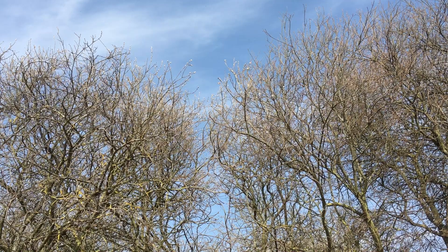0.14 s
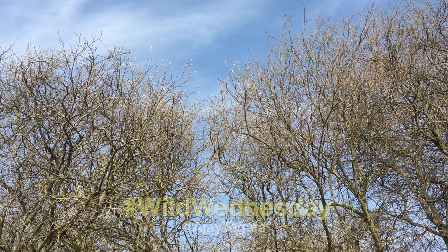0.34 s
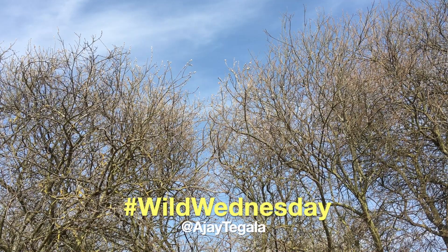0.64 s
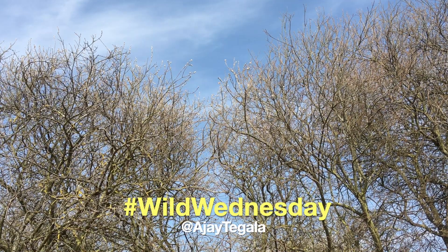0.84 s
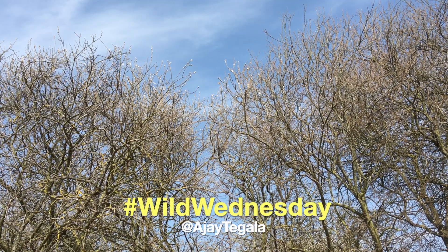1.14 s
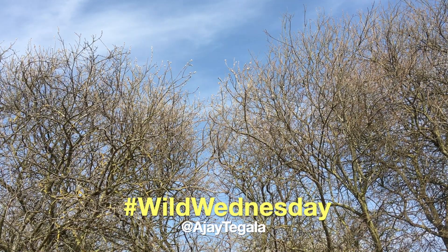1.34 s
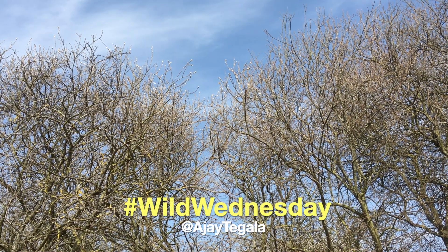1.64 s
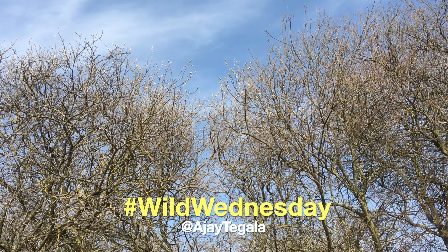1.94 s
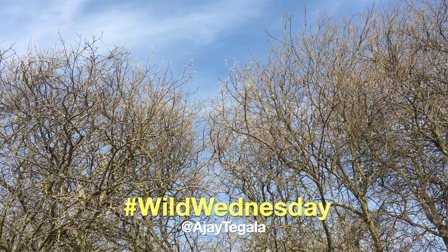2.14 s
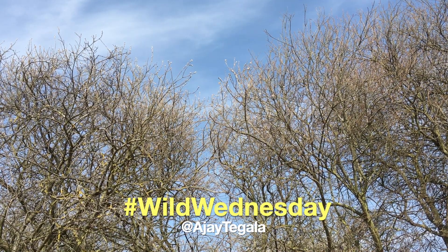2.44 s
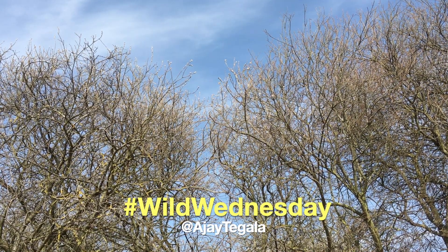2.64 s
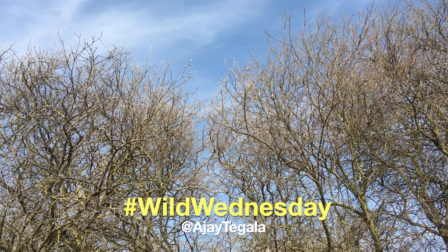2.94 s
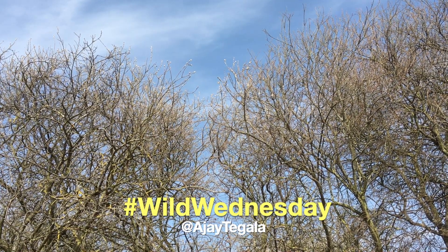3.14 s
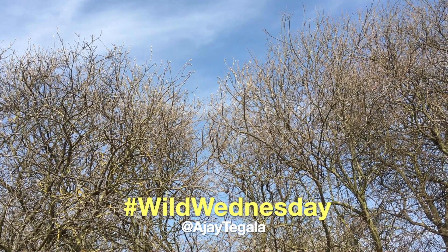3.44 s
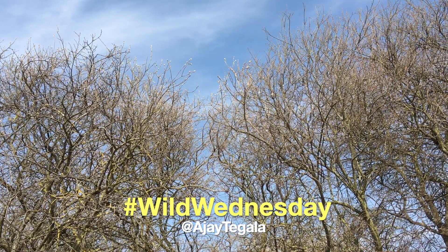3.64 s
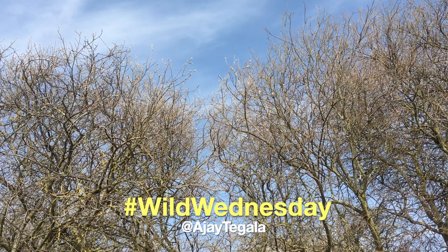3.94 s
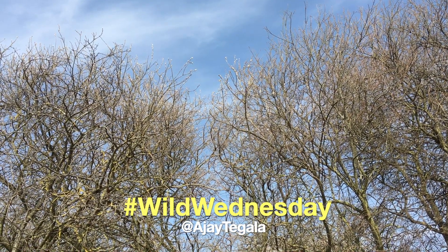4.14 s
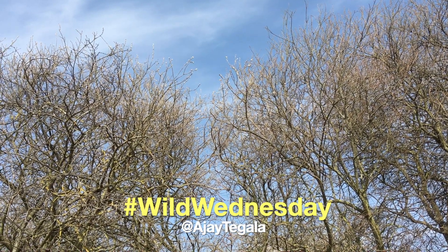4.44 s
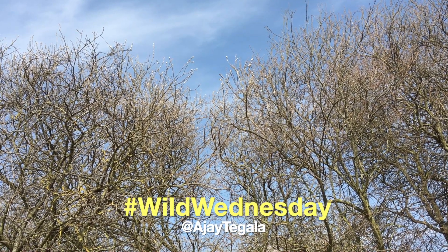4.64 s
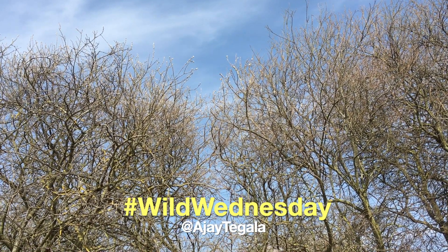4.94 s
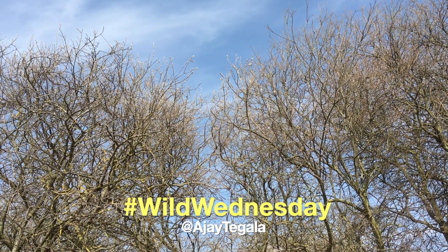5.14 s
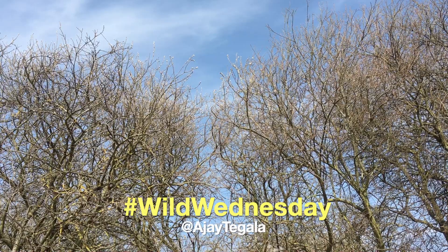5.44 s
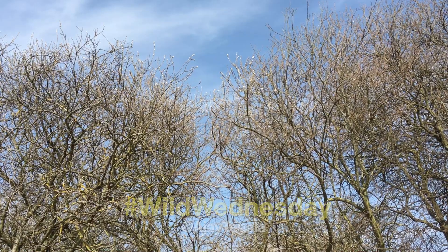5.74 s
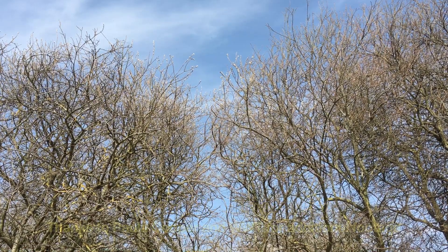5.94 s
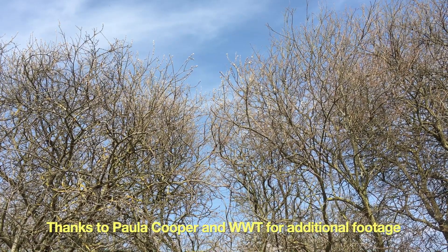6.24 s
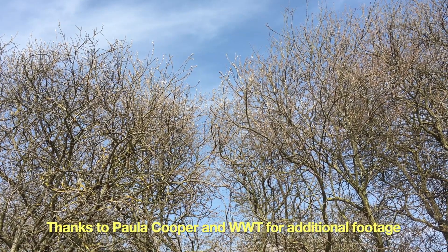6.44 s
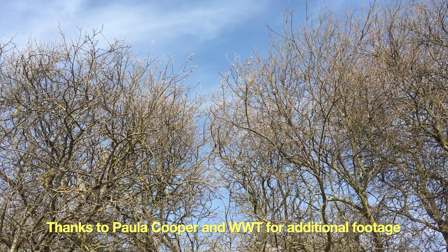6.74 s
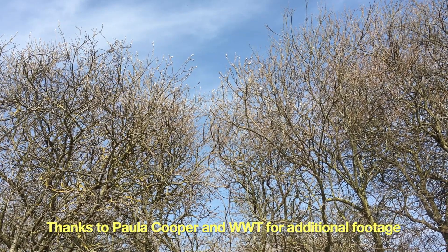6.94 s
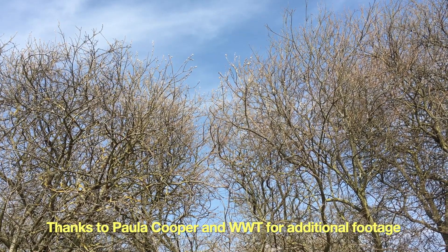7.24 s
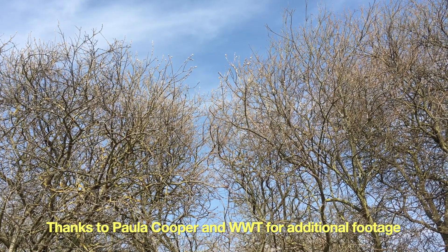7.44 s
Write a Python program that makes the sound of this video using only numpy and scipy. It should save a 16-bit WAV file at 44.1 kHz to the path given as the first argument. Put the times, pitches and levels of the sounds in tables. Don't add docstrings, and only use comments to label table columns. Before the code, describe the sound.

In a bare echoing wood, songbirds whistle and chatter while a woodpecker hammers two rapid rolls and a distant goose honks once.

```python
import sys
import numpy as np
from scipy import signal
from scipy.fft import rfft, irfft, next_fast_len
from scipy.io import wavfile
from scipy.ndimage import uniform_filter1d, map_coordinates

SR = 44100
rng = np.random.default_rng(int(sys.argv[2]) if len(sys.argv) > 2 else 0)


def level_to_linear(level):
    exponent = np.asarray(level, float) / 20
    return 10 ** exponent


def master_out(mix):
    frames = np.transpose(np.atleast_2d(mix))
    ceiling = np.clip(frames, -1, 1)
    pcm = np.round(ceiling * 32767).astype(np.int16)
    wavfile.write(sys.argv[1], SR, pcm)


N = 334719


def unit(x):
    return x / np.sqrt(np.mean(x ** 2) + 1e-20)


def along(points, hz):
    f, v = np.transpose(points)
    return np.interp(np.log(hz + 1), np.log(f + 1), v)


def curves(rows):
    s, *cols = np.transpose(rows)
    return [np.interp(np.arange(N) / SR, s, c) for c in cols]


def wobble(rate_hz):
    knots = rng.standard_normal(int(N * rate_hz / SR) + 4)
    return map_coordinates(knots, [np.arange(N) * rate_hz / SR])


def filtered(x, response):
    m = next_fast_len(N + SR // 2)
    return irfft(rfft(x, m) * response(np.fft.rfftfreq(m, 1 / SR)), m)[:N]


def resonances(modes):
    def response(f):
        total = 0
        for k, (hz, width_hz, db) in enumerate(modes):
            damping = 1j * f * width_hz
            total = total + (-1) ** k * level_to_linear(db) * damping / (hz * hz - f * f + damping)
        return total
    return response


def noise(spectrum):
    return unit(filtered(rng.standard_normal(N), lambda hz: level_to_linear(along(spectrum, hz))))


def add(track, s, sound):
    part = track[round(s * SR):][:len(sound)]
    part += sound[:len(part)]


def echoes(x, gap_s, piece_s=.25):
    # frequency in Hz, t60 in seconds.
    decay = [(500, 0.26), (1300, 1), (3500, 0.94), (8000, 0.6), (14000, 0.19)]
    out, step = np.zeros(N), round(piece_s * SR)
    fade = np.hanning(2 * step)
    padded = np.pad(x, (step, step))
    for k in range(0, N, step):
        hz, t, z = signal.stft(rng.standard_normal(SR), SR, nperseg=256)
        tail = signal.istft(z * level_to_linear(-60 * t / along(decay, hz)[:, None]), SR, nperseg=256)[1]
        tail = tail * (1 + 2.3 * np.exp(-np.arange(len(tail)) / (0.0075 * SR)))
        piece = padded[k:k + 2 * step]
        heard = signal.fftconvolve(piece * fade[:len(piece)], tail / np.linalg.norm(tail))
        add(out, max(k - step, 0) / SR + gap_s, heard[max(step - k, 0):])
    return out


def woodpecker():
    # start in seconds, peak level in dB.
    blows = [(2.6533, -53), (2.7184, -46.5), (2.7774, -44), (2.8324, -45.5), (2.885, -45), (2.939, -45.5),
             (2.9903, -45.5), (3.0392, -46), (3.0873, -47), (3.1345, -47.5), (3.1803, -47), (3.2257, -46),
             (3.269, -48), (3.311, -50.5), (3.3523, -49.5), (3.3894, -53), (3.426, -57)]
    # frequency in Hz, width in Hz, level in dB.
    branch = [(675, 120, -1), (1230, 250, 6.5), (2065, 150, -2.5)]
    # delay in seconds, level in dB.
    trunks = [(.008, -8), (.013, -8.5), (.019, -9.5), (.033, -14)]
    t = np.arange(round(.006 * SR)) / SR
    hz = 1080 + 1300 * np.exp(-t / .0006) + 950 / (1 + np.exp((t - .0024) / .0002))
    attack = np.minimum(t / 0.0024, 1) ** .7
    decay = level_to_linear(-60 * np.maximum(t - .0027, 0) / 0.002)
    chirp = np.sin(2 * np.pi * np.cumsum(hz) / SR) * attack * decay
    knock, push = np.zeros(N), np.zeros(N)
    for s, db in blows:
        add(knock, s, level_to_linear(db + 4.2) * chirp)
        push[round((s + .002) * SR)] = level_to_linear(db + 26)
    hollow = resonances(branch)
    ring = filtered(push, lambda f: hollow(f) ** 2)
    near = sum(level_to_linear(db) * np.roll(ring, round(s * SR)) for s, db in trunks)
    ring_echo = level_to_linear(4.3) * echoes(ring, gap_s=.01, piece_s=0.586)
    knock_echo = level_to_linear(-6.5) * echoes(knock, gap_s=0.00349)
    return knock + level_to_linear(.5) * ring + level_to_linear(2) * near + ring_echo + knock_echo


def whistle(hz, db, quiver_hz=32, flutter_db=2.0):
    t = np.arange(len(hz)) / SR

    def shaky(knots, rate_hz):
        return map_coordinates(rng.standard_normal(knots), [t * rate_hz], mode="mirror")

    phase = 2 * np.pi * np.cumsum(hz + quiver_hz * shaky(64, 170)) / SR
    edge_s = min(0.00059 + 0.077 * t[-1], .006)
    edge = np.sin(np.pi / 2 * np.clip(np.minimum(t, t[-1] - t) / edge_s, 0, 1)) ** 2
    level = level_to_linear(db + flutter_db * shaky(64, 130)) * np.sqrt(2)
    husk = 1 + level_to_linear(-17) * shaky(512, 1700)
    octave = level_to_linear(-52 + 0.0035 * hz) * np.sin(2 * phase)
    return level * edge * husk * (np.sin(phase) + octave)


def song(singers, hooks=(), stairs=(), arches=(), quiver_hz=32, flutter_db=2.2):
    bends = {"level": (0.55, -0.52), "hump": (-7, -6), "dip": (8.83, 3.2), "rise": (-7.5, 3.7),
             "scoop": (-5, 15), "fall": (6.5, -7.5), "flick": (-18.5, 19.7), "drop": (17.6, -9.5),
             "leap": (-27, 3.8), "sag": (2.8, -1.8), "dive": (40, -10), "lift": (-16, 3), "tip": (9, -17),
             "plunge": (28, -28), "bow": (-14, -18), "droop": (1, -7), "cup": (11, 15)}
    hook_shape = [(0, 1.5), (.1, 1.2), (.25, 1.01), (.4, .98), (.7, 1.03), (.82, .98), (1, .72)]
    stair_shape = [(0, 1.28), (.15, 1.08), (.3, 1.0), (.42, .97), (.55, .75), (.65, .67), (1, .65)]
    arch_shape = [(0, .88), (.12, 1), (.4, .96), (1, .82)]
    track = np.zeros(N)
    for singer in singers:
        for bend, notes in singer.items():
            start, end = np.array(bends[bend]) * .01
            for s, length_s, hz, db in notes:
                u = np.linspace(-1, 1, round(length_s * SR))
                path = 1 + (end - start) / 2 * u + (start + end) / 2 * u * u
                add(track, s, whistle(hz * path, db, quiver_hz, flutter_db))
    for shape, calls in ((hook_shape, hooks), (stair_shape, stairs), (arch_shape, arches)):
        for s, length_s, shelf_hz, db in calls:
            path = np.interp(np.linspace(0, 1, round(length_s * SR)), *np.transpose(shape))
            add(track, s, whistle(shelf_hz * uniform_filter1d(path, size=200, mode="nearest"), db))
    return track


def slapped(x):
    # delay in seconds, level in dB.
    slap = [(.0105, -10)]
    return x + sum(level_to_linear(db) * np.roll(x, round(s * SR)) for s, db in slap)


def returning_singers():
    quick = { "level": [(.443, 0.081, 8400, -57), (.628, 0.019, 4630, -56), (.662, 0.014, 4360, -50),
             (.771, 0.01, 4650, -46), (.812, .016, 4310, -47), (.854, 0.012, 4630, -49),
             (.886, 0.014, 4260, -50), (.933, .025, 4660, -50), (1.73, .018, 4890, -59.5),
             (1.786, 0.023, 5900, -55.5), (1.268, .03, 4500, -58), (1.626, .03, 5000, -56),
             (2.022, .02, 5000, -63)], "lift": [(1.25, .016, 4380, -49)], "sag": [(.84, 0.063, 3630, -66.5),
             (.925, 0.046, 3800, -60.5), (1.085, 0.035, 3700, -61.5)], "hump": [(.589, .035, 4467, -45.5)],
             "dip": [(.612, 0.015, 3810, -47), (1.033, .025, 4390, -45), (1.56, 0.027, 6560, -47),
             (1.578, 0.028, 6060, -44), (1.158, .03, 5450, -63)], "rise": [(.724, 0.022, 5060, -53.5),
             (1.16, .025, 5150, -50.5), (1.162, .035, 8050, -73)], "fall": [(.69, .045, 4110, -47.5),
             (1.8, 0.027, 4710, -57), (1.605, .022, 5420, -51)], "drop": [(2.255, .04, 1750, -78),
             (1.82, 0.029, 5400, -56), (2.008, .015, 5450, -57)]}
    upstrokes = {"flick": [(1.548, 0.01, 5630, -53), (1.665, 0.012, 4510, -51.5),
                 (1.773, 0.007, 4720, -48)]}
    return song([quick, upstrokes])


def clear_singer():
    dry_notes = {"level": [(2.34, .055, 3630, -64)], "fall": [(2.285, .032, 5650, -70)],
                 "dive": [(.508, .075, 3250, -76)]}
    # start in seconds, length in seconds, shelf pitch in Hz, level in dB.
    hooks = [(2.673, .102, 4650, -64.5), (3.043, .102, 4650, -66)]
    stairs = [(2.271, 0.13, 5500, -77)]
    return song([dry_notes], hooks, stairs)


def near_singers():
    high = { "leap": [(5.062, 0.049, 8700, -65), (5.072, 0.036, 7640, -62.5)],
            "drop": [(7.52, 0.0073, 6540, -59)], "flick": [(5.582, .012, 4700, -61),
            (6.81, 0.009, 5500, -58)], "lift": [(5.181, .032, 8750, -64), (6.884, .017, 9250, -72)],
            "tip": [(5.104, .025, 8300, -62)], "plunge": [(7.258, .009, 6200, -59)],
            "rise": [(5.191, 0.024, 7480, -54), (5.245, .022, 7380, -53)],
            "fall": [(5.266, .014, 6780, -50)], "dip": [(5.274, .048, 5760, -45), (5.482, 0.037, 6270, -45),
            (5.729, 0.032, 6470, -45.5)], "level": [(5.127, .012, 6750, -60), (5.37, 0.052, 6900, -50.5),
            (5.463, 0.021, 6850, -51), (5.566, 0.08, 7070, -50.5), (5.707, .026, 7070, -51),
            (5.814, 0.079, 7260, -53), (5.897, 0.025, 7220, -56), (6.894, 0.017, 5420, -51),
            (7.526, 0.026, 5500, -50.5)]}
    low = { "fall": [(1.224, 0.021, 3590, -50.5)], "level": [(1.035, 0.017, 3820, -51),
           (1.189, 0.028, 3537, -45.5), (4.84, .1, 3386, -50), (6.165, 0.032, 3267, -59.5),
           (4.797, .045, 3450, -42.5), (4.795, .055, 3720, -62), (4.762, .035, 2750, -69)],
           "scoop": [(1.161, 0.032, 2900, -68), (6.093, 0.026, 2430, -64.5)],
           "rise": [(1.555, 0.048, 3940, -53.5), (2.066, .034, 3370, -65), (4.769, .031, 3340, -46)],
           "drop": [(1.6, 0.016, 3540, -57), (6.054, 0.0155, 3600, -50.5)],
           "dip": [(2.132, 0.033, 3020, -66.5), (6.143, 0.041, 2430, -62.5), (6.268, 0.049, 2110, -65)],
           "hump": [(5.996, 0.021, 4190, -55.5), (6.001, 0.0573, 3396, -45.5), (6.415, .04, 2160, -66),
           (6.08, 0.023, 3470, -50.5), (6.11, .02, 3630, -44.5), (6.14, .02, 3470, -47)]}
    jumble = { "hump": [(6.639, 0.021, 4120, -48.5), (6.72, 0.024, 2566, -51), (6.881, 0.03, 4080, -50),
              (7.006, 0.0093, 3540, -45), (7.455, 0.014, 4020, -46)], "drop": [(6.642, 0.012, 3450, -52.5),
              (7.021, 0.018, 2550, -56.5), (7.329, .009, 3050, -60)], "dip": [(6.787, .016, 4750, -45),
              (6.834, 0.023, 4410, -45), (7.264, 0.0058, 4300, -46.5)], "level": [(6.783, 0.022, 3290, -60),
              (6.802, 0.031, 5080, -49), (6.822, 0.011, 4090, -52), (7.012, 0.014, 3150, -47.5),
              (7.275, 0.013, 3980, -50.5), (7.09, 0.072, 3090, -49), (7.337, 0.014, 2386, -53),
              (6.91, .02, 3400, -64), (7.485, .025, 4700, -55)], "flick": [(6.883, .011, 4500, -55),
              (6.638, .009, 5000, -67)], "fall": [(7.279, 0.0098, 3580, -51), (6.667, .024, 2780, -54.5),
              (7.524, .017, 4350, -52.5)], "scoop": [(7.35, 0.06, 2160, -58), (7.155, .052, 3100, -47.5)],
              "rise": [(7.454, 0.025, 3440, -57.5)], "lift": [(7.471, .014, 4800, -48)]}
    burble = { "level": [(6.268, .035, 2800, -64), (6.305, .027, 2760, -56), (6.335, .017, 2830, -58),
              (6.362, .022, 2850, -59), (6.388, .045, 2720, -62), (6.46, .035, 2664, -63),
              (6.497, .042, 2700, -64), (7.5, .06, 6000, -64)], "sag": [(6.27, .07, 3200, -68)]}
    rough = song([jumble], quiver_hz=75, flutter_db=2.2) + song([burble], quiver_hz=65, flutter_db=5)
    return slapped(song([high]) + rough) + song([low], quiver_hz=45)


def far_singers():
    thin_notes = { "level": [(.31, 0.11, 6470, -66.5), (.445, 0.041, 8000, -75), (2.73, .11, 7500, -80),
                  (3.569, 0.05, 8360, -65), (3.7, 0.023, 8480, -60), (3.786, .038, 8480, -56),
                  (3.917, 0.072, 8440, -53), (4.024, 0.041, 8480, -55.5), (4.23, 0.13, 6700, -81),
                  (7.291, 0.09, 7715, -71), (7.37, 0.034, 7380, -69.5)],
                  "sag": [(3.385, 0.128, 8560, -69.5), (3.586, 0.06, 8070, -75), (3.839, .14, 8020, -61),
                  (3.845, 0.064, 8480, -58.5), (2.88, .2, 6750, -76.5)], "dip": [(.274, 0.031, 6370, -63.5),
                  (7.448, .067, 5730, -64)], "fall": [(1.68, 0.074, 5620, -55), (2.83, .06, 7700, -78)]}
    faint = { "level": [(.03, 0.24, 3670, -78), (.475, 0.058, 4750, -67.5), (2.165, .06, 4630, -70)],
             "scoop": [(.14, 0.036, 4600, -70), (0.41, 0.026, 4300, -83), (7.05, 0.05, 4400, -74)],
             "rise": [(.225, .03, 4300, -69.5)], "bow": [(.218, .042, 2177, -73)],
             "hump": [(3.52, .02, 1000, -69), (3.59, .02, 1000, -69), (2.68, 0.027, 2100, -75)],
             "drop": [(4.248, 0.00995, 2510, -67)]}
    scraps = { "level": [(.34, .022, 5250, -76), (1.407, .037, 4060, -61), (5.01, .045, 4100, -67),
              (4.95, .12, 4520, -68), (.37, .09, 6250, -70), (2.1, .035, 3480, -66),
              (2.413, .022, 2650, -73), (4.105, .014, 5650, -74), (4.4, .055, 6950, -73),
              (4.385, .11, 7300, -79), (6.755, .05, 7800, -77), (6.785, .02, 6500, -70),
              (6.9, .025, 10700, -80), (6.985, .04, 8600, -77), (7.045, .17, 8000, -80),
              (7.462, .015, 6800, -69), (1.905, .028, 5720, -62)], "scoop": [(.45, .028, 5150, -74)],
              "rise": [(.08, .03, 4400, -78), (.195, .03, 4400, -78), (.06, .035, 5850, -80)],
              "droop": [(.226, .028, 3150, -78), (.67, .056, 7850, -68)], "fall": [(.815, .042, 7950, -70),
              (1.945, .045, 6250, -69), (2.425, .03, 3300, -75), (6.785, .02, 8250, -70)],
              "cup": [(2.562, .082, 3600, -72), (6.91, .04, 5900, -69)], "sag": [(7.16, .05, 4500, -67)],
              "lift": [(7.2, .025, 5250, -68)], "drop": [(7.235, .025, 5800, -72)],
              "hump": [(7.56, .028, 8700, -77)]}
    # start in seconds, length in seconds, shelf pitch in Hz, level in dB.
    hooks = [(.322, .092, 4560, -79), (2.884, .102, 4130, -67), (5.808, .092, 4130, -67),
             (6.155, .097, 4660, -65)]
    stairs = [(6.515, .127, 5480, -70)]
    return song([thin_notes, faint, scraps], hooks, stairs)


def refrains():
    turn = {"scoop": (0, .033, 3710), "fall": (0.052, .016, 3900)}
    seep = {"lift": (0, .014, 7600), "sag": (.014, .05, 7700)}
    # start, gap and length in seconds, top pitch in Hz, level in dB.
    runs = [(.607, .177, .058, 6450, -70), (2.24, .164, .07, 6680, -73)]
    run_counts = 5, 3

    def repeated(call, count, start_s, gap_s, db):
        return {bend: [(start_s + k * gap_s + s, length_s, hz, db) for k in range(count)]
                for bend, (s, length_s, hz) in call.items()}

    trills = repeated(turn, 3, start_s=1.688, gap_s=.129, db=-54)
    seeps = repeated(seep, 5, start_s=.538, gap_s=.176, db=-80)
    arches = []
    for (s, gap_s, length_s, hz, db), count in zip(runs, run_counts):
        arches += [(s + k * gap_s, length_s, hz, db) for k in range(count)]
    return song([trills, seeps], arches=arches)


def goose():
    # time in seconds, pitch in Hz, effort in dB, hoarseness 0-1.
    honk = [(3.52, 658, -99, 0.85), (3.545, 680.3, -59, 0.65), (3.6, 693, -66.5, 0.7),
            (3.62, 723.7, -54, 0.42), (3.76, 716, -64.5, 0.25), (3.8, 747, -99, 0.4)]
    # frequency in Hz, width in Hz, level in dB.
    throat = [(690, 154, -5), (1020, 210, -1), (1390, 190, -6), (2120, 190, -2.5), (3600, 154, -1),
              (4300, 520, -10.5)]
    hz, effort_db, hoarse = curves(honk)
    phase = 2 * np.pi * np.cumsum(hz * (1 + 0.0152 * wobble(120))) / SR
    pulses = unit(sum(np.cos(k * phase) for k in range(1, 9)))
    breathy = unit(rng.standard_normal(N) * (1 + np.cos(phase)))
    hoarse = np.clip(hoarse, 0, 1)
    source = (1 - hoarse) * pulses + hoarse * 2.16 * breathy
    voice = (effort_db > -90) * level_to_linear(effort_db) * unit(filtered(source, resonances(throat)))
    return level_to_linear(-3) * voice + level_to_linear(3) * echoes(voice, gap_s=.008)


def chorus(count=700):
    # time in seconds, level in dB.
    swell = [(0.0, -82), (.5, -73), (0.9, -61), (1.9, -61.5), (2.55, -65), (3.2, -76.5), (4.3, -76),
             (6.9, -72.5), (7.59, -66)]
    draw = rng.random((count, 4))
    start_s = draw[:, 0] * N / SR
    length_s = .012 + .02 * draw[:, 2]
    hz = 3600 + 2900 * draw[:, 1] ** 1.5
    notes = np.c_[start_s, length_s, hz, -8 * draw[:, 3]]
    far = song([dict(zip(("flick", "fall", "scoop", "drop"), np.array_split(notes, 4)))])
    return level_to_linear(curves(swell)[0] - 2.5) * unit(level_to_linear(-16.0) * far + echoes(far, gap_s=0.0059))


def traffic():
    # time in seconds, rumble level in dB.
    drift = [(0.0, -60), (0.04, -52.5), (2.81, -59.5), (6.26, -55.5), (6.34, -48), (6.51, -63.5),
             (6.83, -54), (7.59, -59.5)]
    # frequency in Hz, level in dB per Hz.
    spectrum = [(12, -44), (20, -17.5), (36, 2), (54, 2.5), (103, -8), (200, -33.5), (260, -49),
                (440, -120)]
    return level_to_linear(curves(drift)[0]) * unit(level_to_linear(1.53 * wobble(7)) * noise(spectrum))


def wood_hush():
    # time in seconds, level in dB.
    hush_rise = [(0, -1.5), (.45, -1.5), (.6, 0), (7.59, 0)]
    # frequency in Hz, level in dB per Hz.
    spectrum = [(100, -4), (170, -0.5), (660, -3.5), (800, -9), (1110, -6.5), (1580, -15.5), (2630, -17.5),
                (5000, -23), (7700, -25), (10400, -28.5), (12000, -27.5), (15500, -30.5)]
    return level_to_linear(-64.5 + .7 * wobble(5) + curves(hush_rise)[0]) * noise(spectrum)


def wind_puffs():
    # time in seconds, level in dB.
    gusts = [
        [(6.28, -107), (6.33, -46), (6.45, -75)],
        [(6.64, -70.5), (6.802, -52.5), (7.3, -72)],
    ]
    puff_db = curves([row for gust in gusts for row in gust])[0]
    spectrum = [(15, -42), (35, 3.0), (90, -2), (200, -12.0), (280, -49), (500, -68), (900, -120)]
    return level_to_linear(puff_db + 6.0) * noise(spectrum)


def twig_ticks():
    # start in seconds, peak level in dB.
    snaps = [(1.1694, -68), (4.4365, -60), (4.7676, -67), (6.7994, -68), (6.8922, -68), (7.4699, -67)]
    ticks, t = np.zeros(N), np.arange(300) / SR
    for s, db in snaps:
        burst = np.diff(rng.standard_normal(len(t) + 1))
        add(ticks, s, level_to_linear(db - 1.5 - 60 * t / 0.015) * burst)
    return ticks


def scene():
    quick, clear = returning_singers(), clear_singer()
    passage_echo = level_to_linear(-3.5) * echoes(quick + level_to_linear(-7) * clear, gap_s=.006)
    passage = woodpecker() + level_to_linear(-1.8) * slapped(quick) + clear + passage_echo
    again_s = 158919 / 44100
    both = passage + np.pad(passage, (round(again_s * SR), 0))[:N]
    far = far_singers() + refrains()
    near = near_singers()
    song_echo = echoes(level_to_linear(-2.5) * far + level_to_linear(-5.8) * near, gap_s=.006)
    birds = both + level_to_linear(1.0) * far + level_to_linear(2.3) * near + song_echo + goose() + chorus()
    return (birds + traffic() + wood_hush() + wind_puffs() + twig_ticks())[None]


def roll_off(x):
    return signal.sosfilt(signal.butter(12, 15660, fs=SR, output="sos"), x)


def record(dry):
    thin = filtered(dry[0], lambda hz: (hz < 15660) / (1 + (30 / (hz + 1)) ** 4))[None]
    return roll_off(thin)


dry = scene()
out = record(dry)
master_out(out)
```